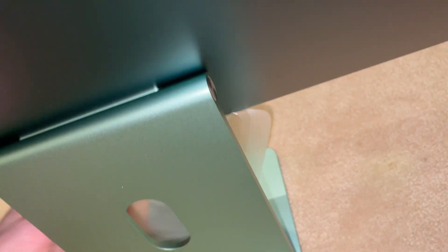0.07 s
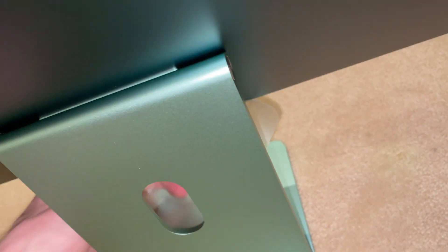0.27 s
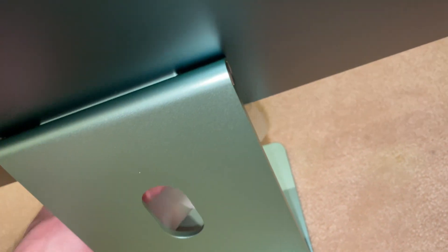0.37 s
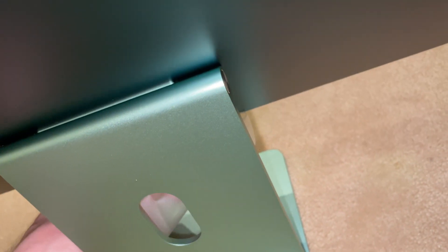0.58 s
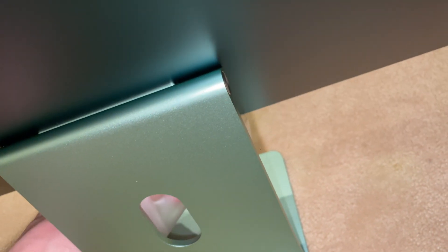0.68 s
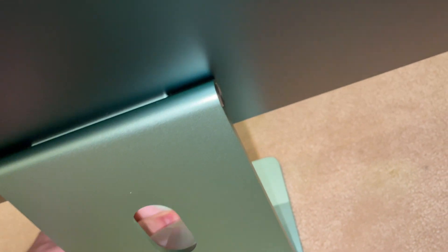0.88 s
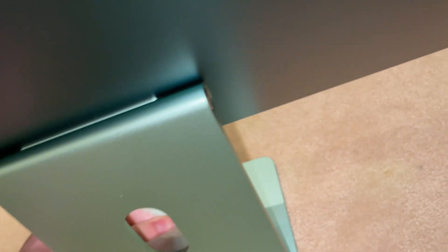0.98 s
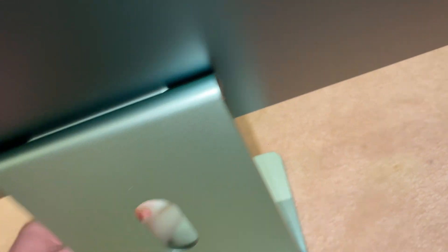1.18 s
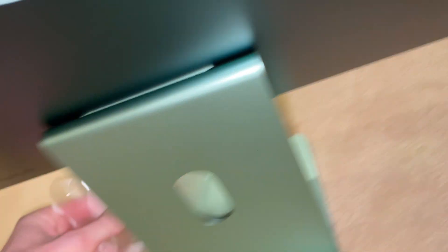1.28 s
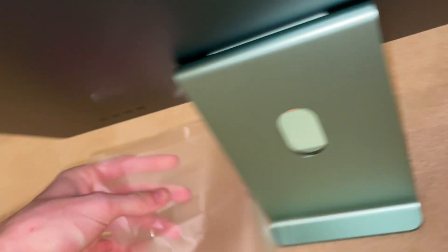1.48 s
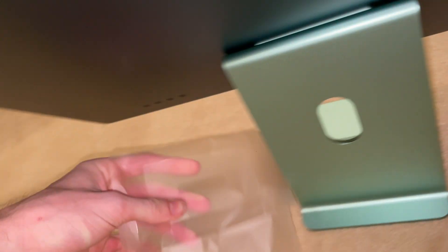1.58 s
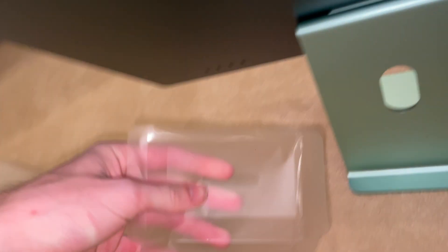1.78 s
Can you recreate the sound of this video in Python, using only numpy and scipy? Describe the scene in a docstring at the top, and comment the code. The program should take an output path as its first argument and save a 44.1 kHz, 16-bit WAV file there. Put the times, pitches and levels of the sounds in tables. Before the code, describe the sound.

Crinkling plastic film, close up: a burst of snaps and pops, then softer rustling

```python
"""Plastic film pulled off a stand

Thin film is pulled off a metal stand and gathered in a hand, close by in a quiet room.
Each buckling crease cracks and sends a bending wave through the sheet, highs first and lows later.
Taut patches ping or knock; sliding film rustles with tiny crackles and rubs dully on the stand.
Tugs leave a low wobble ringing. Short reflections and a soft background surround the film."""
import sys
import numpy as np
from scipy import signal
from scipy.io import wavfile
from scipy.ndimage import uniform_filter1d

SR = 44100
rng = np.random.default_rng(int(sys.argv[2]) if len(sys.argv) > 2 else 0)


def wrap_up_sound(samples):
    """Save the sound to the file named by the first command line argument, as 16-bit audio."""
    columns = np.atleast_2d(samples).T
    # keep every value between -1 and 1, then stretch to whole-number steps
    tamed = np.clip(columns, -1, 1)
    steps = np.round(tamed * 32767).astype(np.int16)
    wavfile.write(sys.argv[1], SR, steps)


N = 79380
TIME = np.arange(N) / SR

# Buckling creases, levels before the colour and side gains:
# [t/s, crack level/dB, crack decay/ms, brightness/(dB per octave), flap level/dB, flap f/Hz]
SNAPS = [(0.1047, -39, 3.6, -4.5, -35.5, 656), (0.1354, -26, 1.4, -4.5, -25.5, 636),
         (0.1923, -24.5, 1, -2, -42, 604), (0.199, -35, 0.8, -2, -23, 600),
         (0.2112, -24.5, 3.5, -2.5, -18.5, 704), (0.2456, -16.5, 2.2, -0.5, -21.5, 670),
         (0.2588, -31, 1.5, -4, -31, 700), (0.2769, -28, 2.6, -9, -28, 920),
         (0.2797, -42, 2.5, -10, -19, 197), (0.2888, -19.5, 2.5, 5.5, -10.5, 494),
         (0.3007, -23.5, 4.8, 6, -44, 397), (0.3065, -15.5, 6.6, 0.5, -20.5, 684),
         (0.3149, -13.5, 3.9, -1, -16, 470), (0.3262, -18, 2.5, 4, -25, 410),
         (0.3647, -14, 0.92, 0, -17, 855), (0.3740, -31, 1.9, 7, -36, 826),
         (0.387, -17.5, 0.55, -1.5, -22.5, 940), (0.4054, -34, 1.4, -5, -29.5, 347),
         (0.4198, -14.5, 1.5, 6, -23.5, 730), (0.439, -24.5, 2, -1.5, -16, 518),
         (0.4811, -46, 1.8, -7, -27.5, 241), (0.5195, -38, 1.7, -6, -33, 630),
         (0.5844, -11.5, 1.48, 3, -6.5, 705), (0.634, -12.5, 1.33, -1.5, -19.5, 430),
         (0.7679, -23, 11, -3, -22, 890), (0.77, -29, 14, 4, -20, 447), (0.7824, -7, 3.9, -1.5, -10, 720),
         (0.8075, -7, 5.2, 1, -3.5, 694), (0.8124, -25, 2, -3, -11.5, 417),
         (0.822, -10, 0.86, -1, -17.5, 624), (0.8347, -27.5, 1.2, -6, -46, 400),
         (0.85, -27.5, 1.7, -2.5, -27, 900), (0.8844, -28, 3.7, -0.5, -30, 940),
         (0.899, -26, 3.3, -0.5, -25, 980), (0.9149, -32, 10.4, -3.5, -50, 900),
         (0.927, -30, 3, -2, -24.5, 990), (0.954, -32, 3.8, -4.5, -56, 960),
         (0.9850, -34.5, 12, -1, -23.5, 1060), (1.009, -37, 0.9, -8.5, -36, 215),
         (1.0907, -26, 1.43, 0.5, -49, 820), (1.1295, -37, 1.6, 0, -29, 540),
         (1.1497, -19, 1.17, 0.5, -34, 600), (1.176, -25.5, 1.3, -1, -53, 700),
         (1.1856, -24.5, 0.7, -4, -37, 544), (1.2031, -24, 0.76, 0.5, -41, 600),
         (1.2365, -28, 2.7, 1, -54, 456), (1.2516, -17.5, 0.54, 1.5, -32, 446),
         (1.2762, -28.5, 3.6, -1, -31, 486), (1.3138, -27.5, 2.6, -1, -38, 286),
         (1.3488, -31, 1.6, -2.5, -52, 500), (1.41, -31, 1.1, -4.5, -40, 800),
         (1.5298, -31.5, 4, 5, -44, 402), (1.6775, -43, 2.8, -4, -35.5, 566),
         (1.706, -45, 2.2, -7, -30, 560), (1.713, -17.5, 3.74, 0, -31.5, 425)]


def from_db(db):
    """Turn decibels into a gain."""
    return 10 ** (np.asarray(db) / 20)


def at_hz(points, hz):
    """Read a curve of values over pitch, with pitch spaced in octaves."""
    f, values = np.transpose(points)
    return np.interp(np.log(hz), np.log(f), values)


def in_time(rows):
    """Join the rows of a curve over time by straight lines."""
    s, *columns = np.transpose(rows)
    return [np.interp(TIME, s, column) for column in columns]


def add(track, s, sound):
    """Mix a sound into a track, starting at s seconds."""
    start = int(s * SR)
    track[start:start + len(sound)] += sound[:N - start]


def flicker(size=900):
    """Smooth random wandering with a spread of 1, made by averaging noise twice."""
    smooth = uniform_filter1d(uniform_filter1d(rng.standard_normal(N), size), size)
    return smooth / smooth.std()


def stereo_noise(hz):
    """White noise whose left-right likeness and balance depend on the pitch asked for."""
    # how alike left and right are, limited to -1..1 below: [f/Hz, likeness]
    likeness = [(300, 2), (700, 0.5), (1300, 0), (1800, -0.6), (2500, 0.88), (4500, 0.07), (6500, 0.97),
                (7800, -2), (9500, -2.32), (11000, 7.5), (14000, -2.5)]
    # left over right: [f/Hz, level/dB]
    balance = [(100, -1), (300, -3), (700, 6), (1300, 5.5), (2500, 1), (5000, 1.5), (10000, 0)]
    alike = np.clip(at_hz(likeness, hz), -1, 1)
    mid, side = rng.standard_normal((2, N))
    signs = np.array([[1], [-1]])  # left, right
    shared = np.sqrt((1 + alike) / 2) * mid
    opposed = np.sqrt((1 - alike) / 2) * side * signs
    return (shared + opposed) * from_db(signs * at_hz(balance, hz) / 2)


def banded(envelope):
    """Noise split into narrow bands, each given its loudness over time by envelope(hz)."""
    edges = np.r_[np.geomspace(28, 1000, 11)[:-1], np.geomspace(1000, 17000, 19)]
    out = 0
    for low, high in zip(edges, edges[1:]):
        hz = np.sqrt(low * high)
        band = signal.butter(2, [low, high], "band", fs=SR, output="sos")
        noise = stereo_noise(hz) * (envelope(hz) + 1e-12)
        out = out + signal.sosfilt(band, noise)
    return out


def dying_noise(decay_s, size):
    """A burst of noise of unit energy that dies away."""
    burst = rng.standard_normal(size) * np.exp(-TIME[:size] / decay_s)
    return burst / np.linalg.norm(burst)


def cracks(size=4000):
    """Each crease gives a sharp burst and a faint shiver of the sheet; low bands come later."""
    # colour of every crack: [f/Hz, level/dB]
    crack_colour = [(150, 4), (500, 3), (1000, -0.5), (1500, 7), (1900, -2.5), (2500, 3.5), (3850, 3),
                    (4800, -3), (6600, 1.5), (8200, -1), (11000, -3.5), (13500, -13), (16000, -8)]
    delay_cycles = 0.57  # lateness, in cycles of each band's pitch
    tail_db, tail_s = -27, 0.022  # the shiver, relative to the burst
    variety_db = 0.5  # each crack favours other bands
    t = TIME[:size]
    shiver = from_db(tail_db) * np.exp(-t / tail_s)
    shapes = [np.exp(-t / (decay_ms * 1e-3)) + shiver for _, _, decay_ms, *_ in SNAPS]

    def envelope(hz):
        power = np.zeros(N)
        octaves = np.log2(max(hz, 1000) / 4000)  # brightness pivots at 4 kHz and stays flat below 1 kHz
        for (s, db, _, tilt, *_), shape in zip(SNAPS, shapes):
            band_db = db + tilt * octaves + variety_db * rng.standard_normal()
            add(power, s + delay_cycles / hz, (from_db(band_db) * shape) ** 2)
        return np.sqrt(power) * from_db(at_hz(crack_colour, hz))

    return banded(envelope)


def flaps(size=3500):
    """The bending wave of each snap: a fast falling sweep, strongest near the buckling patch's pitch."""
    delay_cycles = 1.707  # a pitch arrives this many of its cycles after the snap
    octaves_above, octaves_below = 0.76, 0.74  # spread around the strongest pitch
    scatter_db, scatter_decay_s = -10, 0.0037  # the wave comes back from folds and edges
    left_db, right_db, right_lag_s = -1, -4.5, 0.000082
    t = TIME[1:size]
    direct, scattered = np.zeros(N), np.zeros(N)
    for s, *_, db, hz in SNAPS:
        octaves = np.log2(delay_cycles / t / hz)  # distance of the sweep from the patch's pitch
        spread = np.where(octaves > 0, octaves_above, octaves_below)
        swell = np.exp(1 - np.sqrt(1 + 2 * (octaves / spread) ** 2))
        swell = swell * (1 - t / t[-1])  # fade fully to silence
        sweep = np.sin(2 * np.pi * delay_cycles * np.log(t * hz))
        wave = from_db(db) * swell * rng.choice([-1, 1]) * sweep
        add(direct, s, wave)
        add(scattered, s, signal.fftconvolve(wave, dying_noise(scatter_decay_s, size=size)))
    left = direct + from_db(scatter_db) * scattered
    right = np.interp(TIME - right_lag_s, TIME, left)
    return np.array([from_db(left_db) * left, from_db(right_db) * right])


def rings(size=3500):
    """A taut patch swells and dies away in three close modes: a ping, a knock or a dull bump."""
    # taut patches, small ones high and large ones low, levels before mode mixing and side gains:
    # [t/s, f/Hz, level/dB, swell/ms]
    patches = [(0.2464, 3440, -16, 1.25), (0.289, 1290, -23.5, 2), (0.314, 578, -10.5, 2.9),
               (0.441, 200, -32, 6.9), (0.585, 2430, -16.5, 1), (0.5875, 208, -23, 4.5),
               (0.7827, 1495, -11.5, 3.8), (0.787, 179, -21, 7.7), (0.808, 640, -12, 2.95),
               (0.817, 177, -18, 4.5), (0.818, 89.6, -17.5, 9), (1.014, 196, -41.5, 8),
               (1.135, 146, -43.5, 7.3), (1.1505, 2450, -30, 1.1), (1.1861, 1400, -31, 1.4),
               (1.2027, 2420, -25.5, 1.9), (1.24, 416, -36, 5.6), (1.2497, 2310, -31, 1.4),
               (1.316, 195, -37.5, 8.3), (1.41, 930, -34.5, 2.2), (1.524, 6000, -28, 2.1),
               (1.536, 127, -44.5, 8.4), (1.717, 217, -45, 6.6)]
    wander = 0.038  # random spread of the modes, as a share of the patch's pitch
    left_db, right_db, right_lag_s = 3, -0.5, 0.00004  # the patches lie left of centre
    t, out = TIME[:size], np.zeros(N)
    for s, hz, db, swell_ms in patches:
        age = t / (swell_ms * 1e-3)
        swell = (age * np.exp(1 - age)) ** 2  # peaks at age 1
        modes_hz = hz * (1 + wander * rng.standard_normal((3, 1)))
        tone = np.sin(2 * np.pi * modes_hz * t).mean(axis=0)
        add(out, s, from_db(db) * swell * tone)
    right = np.interp(TIME - right_lag_s, TIME, out)
    return np.array([from_db(left_db) * out, from_db(right_db) * right])


def rustle():
    """Sliding film: fine friction and a stream of tiny crackles of uneven size and colour."""
    # loudness of the sliding before colour: [t/s, low level/dB, middle level/dB, treble level/dB]
    slide_levels = [(0, -53, -60, -58.5), (0.155, -55, -60, -58), (0.18, -50, -51, -46.5),
                    (0.225, -39, -43.5, -42), (0.34, -40.5, -37.5, -45), (0.41, -47.5, -46.5, -52.5),
                    (0.47, -52, -53, -62), (0.57, -57.5, -58.5, -63), (0.65, -42, -50.5, -72),
                    (0.76, -46, -59, -63), (0.82, -37.5, -38, -48.5), (0.91, -52, -47.5, -61),
                    (0.945, -49, -53.5, -72), (0.965, -56, -41, -60), (1.012, -53.5, -51.5, -56),
                    (1.03, -59, -61, -80), (1.08, -61, -62.5, -76), (1.105, -53.5, -46, -66),
                    (1.19, -57.5, -46, -43), (1.225, -58, -57.5, -58), (1.275, -55.5, -51.5, -42.5),
                    (1.375, -45, -58, -56), (1.41, -56, -50, -44.5), (1.465, -44, -59.5, -33),
                    (1.52, -51.5, -50.5, -49), (1.57, -49, -58.5, -58), (1.62, -75, -70.5, -65.5),
                    (1.70, -55, -64.5, -62.5), (1.8, -58, -64, -63)]
    # pitches where the low, middle and treble levels hold: [f/Hz]
    slide_bands_hz = [470, 1760, 19200]
    # colour of the rustle: [f/Hz, level/dB]
    rustle_colour = [(60, 5), (200, 9), (400, 15.5), (900, 14), (1400, 13.5), (1900, 11), (2500, 12),
                     (4500, 9.5), (6700, 10), (8300, 5.5), (10000, 4.5), (12500, 5.5), (15000, -8)]
    crackles_per_s, crackle_decay_s = 330, 0.0024
    size_spread_db, variety_db = 4.5, 4.5  # uneven sizes; each crackle favours other bands
    crackle_db, friction_db = -4.5, -2  # the two parts of the grain
    flicker_db = 2.5
    levels = np.array(in_time(slide_levels))
    born = np.flatnonzero(rng.random(N) < crackles_per_s / SR)
    sizes_db = size_spread_db * np.minimum(rng.exponential(1, N), 4)[born]

    def envelope(hz):
        clicks = np.zeros(N)
        clicks[born] = from_db(sizes_db + variety_db * rng.standard_normal(N)[born]) ** 2
        # every click's power dies away
        power = signal.lfilter([1], [1, -np.exp(-2 / (crackle_decay_s * SR))], clicks)
        crackle_power = from_db(crackle_db) ** 2 * power / power.mean()
        grain = np.sqrt(from_db(friction_db) ** 2 + crackle_power)
        # how much this band follows the low, middle and treble levels
        shares = np.array([np.interp(np.log(hz), np.log(slide_bands_hz), row) for row in np.eye(3)])
        band_db = shares @ levels + at_hz(rustle_colour, hz) + flicker_db * flicker()
        return grain * from_db(band_db)

    return banded(envelope)


def rub():
    """The taut film drags dully over the stand: noise in one band, silent outside the drag."""
    # loudness of the drag: [t/s, level/dB]
    rub_levels = [(0.60, -48), (0.63, -44.5), (0.68, -35), (0.71, -41), (0.77, -45.5), (0.79, -43)]
    low_hz, high_hz = 564, 1070
    band = signal.butter(2, [low_hz, high_hz], "band", fs=SR, output="sos")
    noise = signal.sosfilt(band, stereo_noise(np.sqrt(low_hz * high_hz)))
    level_db = np.interp(TIME, *np.transpose(rub_levels), left=-np.inf, right=-np.inf)
    return noise / noise.std() * from_db(level_db)


def wobble():
    """Each tug shakes the sheet and stand and sets their low modes ringing."""
    # tugs, levels added to those of the modes: [t/s, level/dB]
    tugs = [(0.215, -3), (0.29, -21), (0.781, 3), (0.836, 1)]
    # low modes, with the time to fall by 60 dB: [f/Hz, level/dB, fall time/s]
    low_modes = [(55.1, -29.5, 0.44), (96, -32.5, 0.21), (174.3, -30.5, 0.28)]
    attack_s, right_db = 0.0036, -4.5
    ring = sum(from_db(db - 60 * TIME / t60) * np.sin(2 * np.pi * hz * TIME) for hz, db, t60 in low_modes)
    ring = ring * (1 - np.exp(-TIME / attack_s))
    out = np.zeros(N)
    for s, db in tugs:
        add(out, s, from_db(db) * ring)
    return out * from_db([[0], [right_db]])


def room(x, size=22000):
    """Early reflections from nearby surfaces: a short, dull tail, different on each side."""
    level_db, t60_s, dull_hz = -10, 0.041, 4760  # level and fall time before dulling
    tails = np.array([dying_noise(t60_s / np.log(1000), size=size) for _ in x])
    tails = signal.lfilter(*signal.butter(1, dull_hz, fs=SR), tails)
    return from_db(level_db) * signal.fftconvolve(x, tails, axes=1)[:, :N]


def background():
    """The steady noise of the quiet room, shaped band by band."""
    # colour of the background: [f/Hz, level/dB]
    floor_colour = [(30, -99), (55, -26.5), (90, -31.5), (140, -38.5), (300, -51.5), (1000, -69),
                    (4000, -82), (8000, -99), (15000, -69)]
    return banded(lambda hz: from_db(at_hz(floor_colour, hz)))


def scene():
    """The film and its reflections, the low wobble and the background."""
    film = cracks() + flaps() + rings() + rustle() + rub()
    return film + room(film) + wobble() + background()


def record(dry):
    """Rumble is cut, peaks are softly rounded and the top is cut."""
    low_cut_hz, top_cut_hz = 38, 16600
    low_cut = signal.butter(4, low_cut_hz, "high", fs=SR, output="sos")
    top_cut = signal.ellip(10, 0.1, 80, top_cut_hz, fs=SR, output="sos")
    rounded = np.tanh(signal.sosfilt(low_cut, dry))
    return signal.sosfilt(top_cut, rounded)


dry = scene()
out = record(dry)
wrap_up_sound(out)
```